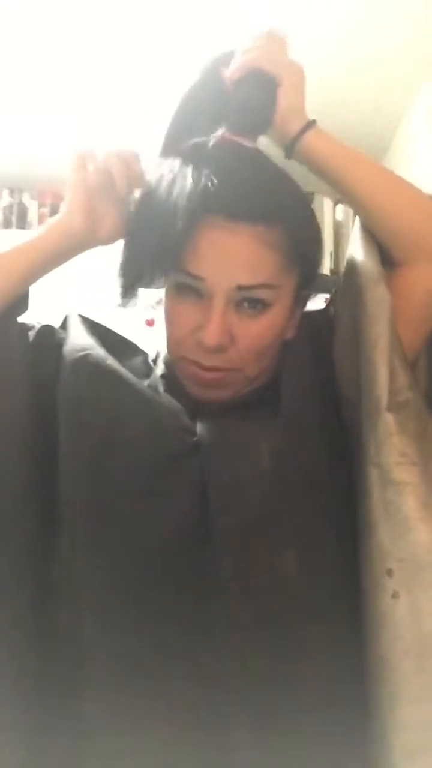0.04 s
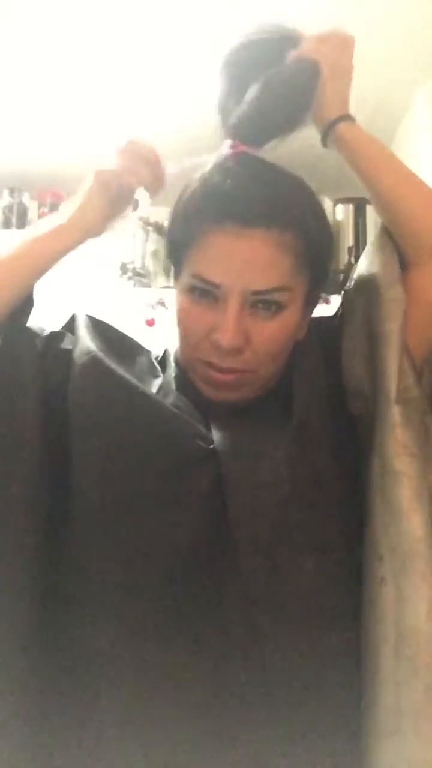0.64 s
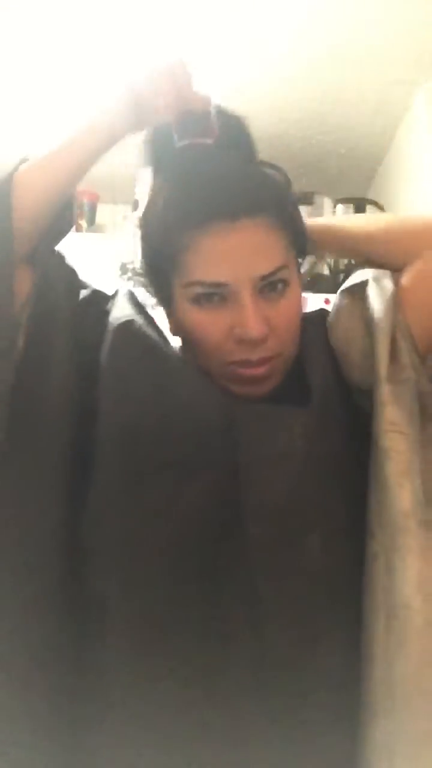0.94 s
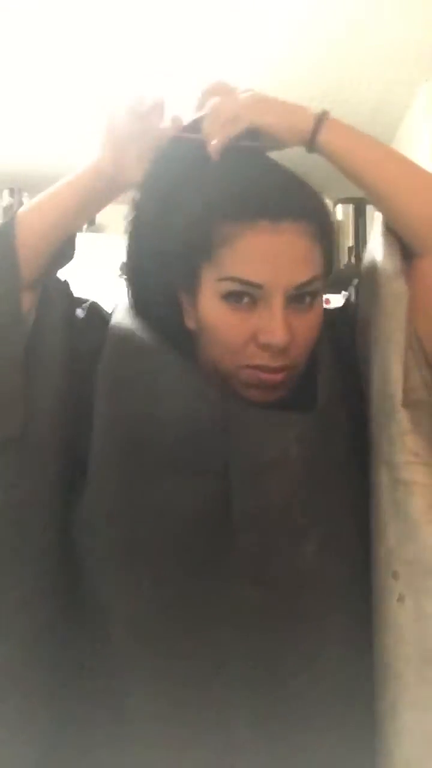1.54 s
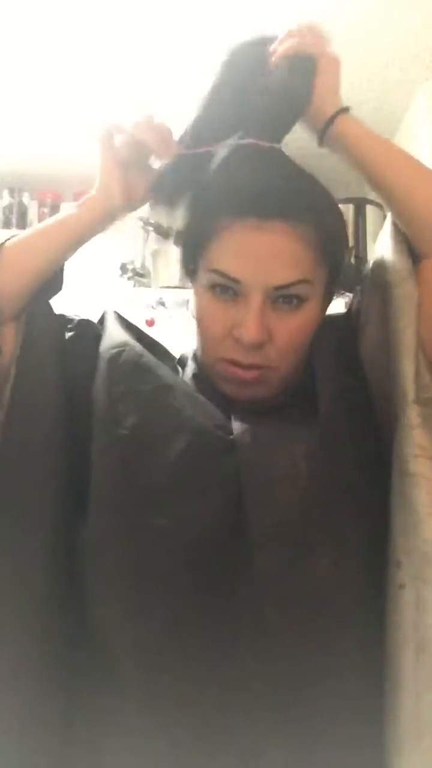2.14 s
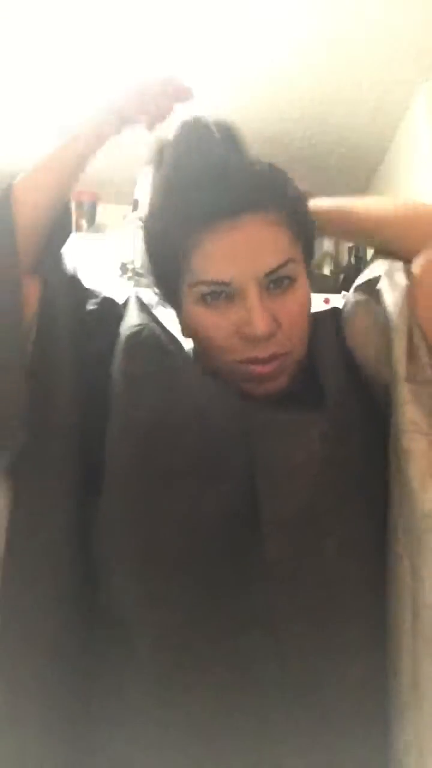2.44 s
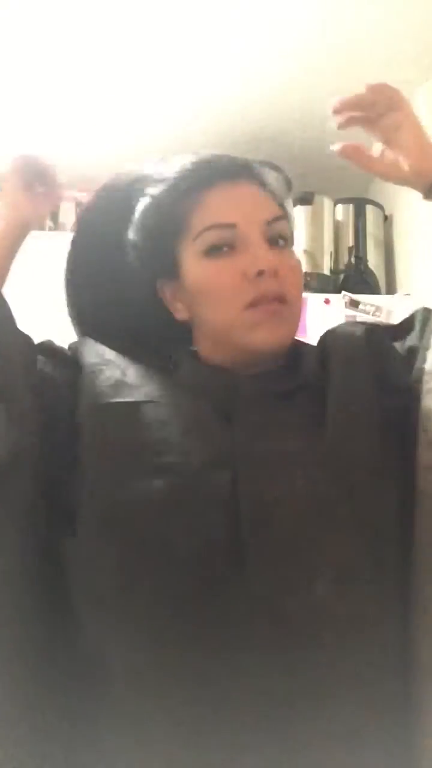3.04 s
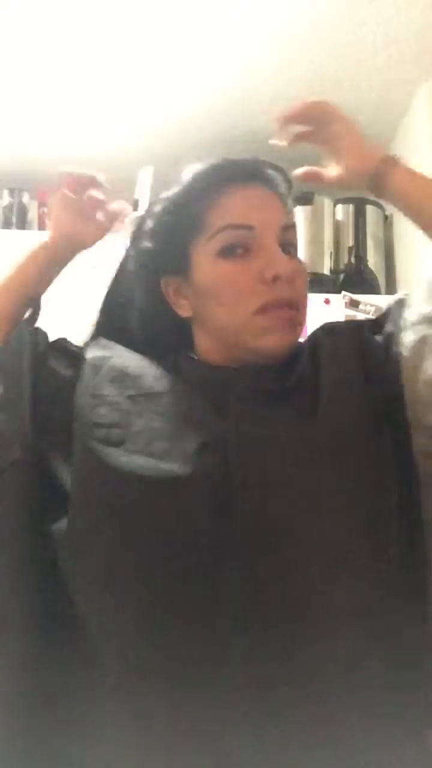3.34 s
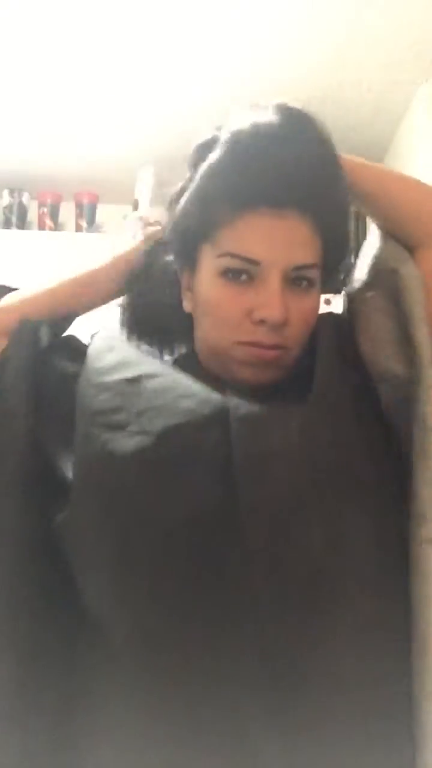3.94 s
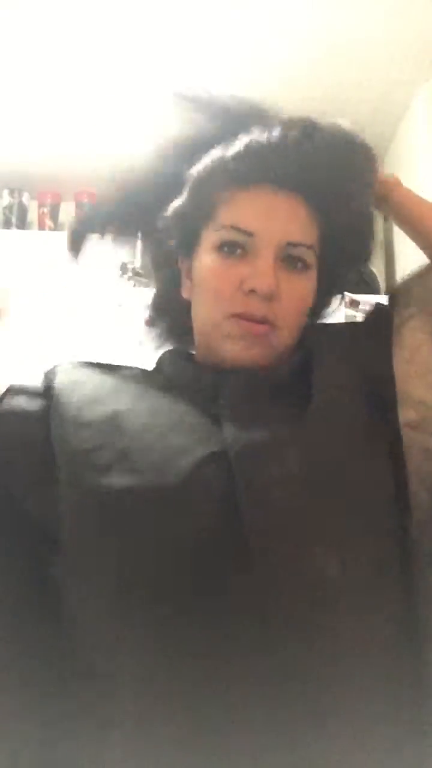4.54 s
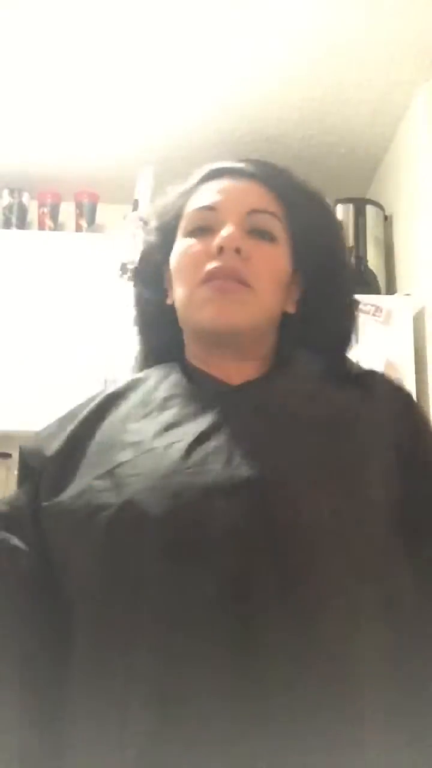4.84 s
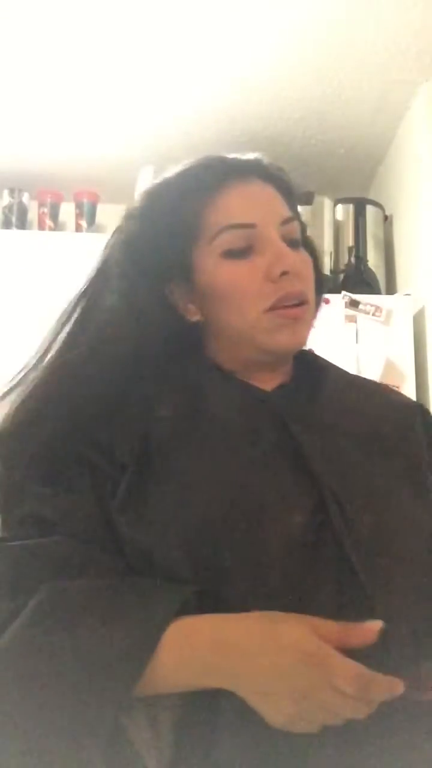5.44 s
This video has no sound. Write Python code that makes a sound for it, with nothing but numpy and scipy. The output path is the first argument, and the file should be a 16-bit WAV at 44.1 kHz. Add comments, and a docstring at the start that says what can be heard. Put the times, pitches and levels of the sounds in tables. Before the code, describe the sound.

Quiet, uneven strokes of hands through long hair rustle and hiss near the microphone, with a couple of soft plucks from a hair tie. The strokes grow busier, mixed with small snaps of tangles and the crinkle of a thin cape. Then the cape rustles louder and flaps sharply as the arms come down, and fades. Low room noise and a faint wavering hum fill the small, dry room.

```python
"""Shaking out long hair

Someone in a thin salon cape pulls long hair loose, close to a phone in a small room.
Hands swish along the hair, strands hiss between the fingers, the hair tie slips and tangles give way.
The cape crinkles, then billows and snaps its folds as the arms drop.
A low appliance hum wavers under the quiet room noise."""
import sys
import numpy as np
from scipy import signal
from scipy.fft import rfft, irfft, next_fast_len
from scipy.io import wavfile
from scipy.ndimage import uniform_filter1d, map_coordinates

SR = 44100
rng = np.random.default_rng(int(sys.argv[2]) if len(sys.argv) > 2 else 0)


def digitize_waveform(pressure):
    """Quantize a signal to 16-bit integers and store it at the path in sys.argv[1].

    Rows of a 2-D input are taken as channels; values are limited to [-1, 1].
    """
    field = np.atleast_2d(pressure).T
    bounded = np.clip(field, -1, 1)
    quanta = np.round(bounded * 32767).astype(np.int16)
    wavfile.write(sys.argv[1], SR, quanta)


N = 246641

# A hand passes along the hair; a faster slide sounds higher, and the raised arm drags the cape.
# (start [s], length [s], relative levels of swish [dB], hiss [dB] and cape [dB], swish pitch [Hz])
HAND_PASSES = [(0.0, 0.05, -73, -70, -85, 2470), (.353, 0.011, -59, -71, -59, 2500),
               (0.396, 0.034, -65, -66, -71, 2400), (0.71, .16, -65, -71, -69, 2770),
               (0.921, .1, -52.5, -52, -61.5, 2430), (1.04, 0.036, -53, -68, -61, 2050),
               (1.13, 0.037, -47.5, -56, -55, 1840), (1.206, 0.099, -53, -64, -63.5, 2620),
               (1.662, 0.28, -70.5, -66.5, -69, 2700), (1.898, 0.014, -61, -67, -66, 2760),
               (2.085, 0.083, -58.5, -67.5, -69.5, 3200), (2.333, 0.023, -57.5, -55, -60.5, 2780),
               (2.449, 0.046, -49.5, -52.5, -62, 2800), (2.506, 0.057, -45.5, -52.5, -58.5, 2350),
               (2.625, 0.061, -42.5, -51, -51.5, 1780), (2.755, 0.24, -56, -62.5, -60, 1660),
               (3.047, 0.075, -55, -58.5, -55.5, 2180), (3.257, 0.21, -53.5, -58.5, -59.5, 2240),
               (3.525, 0.064, -46, -46.5, -54, 3500), (3.662, 0.036, -48.5, -47, -52.5, 2800),
               (3.973, 0.037, -55, -55.5, -55.5, 3800), (4.081, 0.04, -57.5, -57.5, -59, 3260),
               (4.308, 0.21, -65.5, -65, -65, 2560)]
# The arms come down and the hair slides over the cape.
# (time [s], relative levels of cape [dB] and hiss [dB])
ARM_DROP = [(4.49, -80, -85), (4.53, -55.5, -62.5), (4.66, -51.5, -51), (4.85, -41, -44), (5.05, -45, -46),
            (5.17, -43.5, -49), (5.28, -50.5, -55.5), (5.35, -58.5, -64), (5.59, -68.5, -66.5)]
# The hum grows louder for a moment (time [s], level [dB])
HUM_PEAKS = [(.05, -64), (.29, -60.5), (.55, -58.5), (.82, -55), (1.58, -58.5), (1.87, -62.5), (2.35, -62),
             (2.59, -58), (3.39, -62), (4.76, -61.5)]
# The hair tie slips with a dull pluck (time [s], strength [dB], pitch [Hz])
TIE_PLUCKS = [(.2592, -34.5, 580), (1.216, -31, 1220)]
# Tangles give way (time [s], strength [dB], pitch [Hz])
TANGLE_SNAPS = [(.2595, -44, 3220), (.92, -39.5, 2300), (3.191, -37, 1600), (3.263, -40.5, 4300),
                (3.4055, -34.5, 5650), (3.406, -35, 9500), (4.078, -46, 3070)]
# Locks of hair slip out of the fingers (start [s], length [s], level [dB])
LOCK_SLIPS = [(0.753, 0.042, -66), (1.13, 0.029, -64), (2.105, 0.022, -69), (2.618, 0.038, -55),
              (3.398, 0.05, -54.5), (4.074, 0.048, -54.5), (4.598, 0.032, -51.5)]
# Folds of the cape snap over (time [s], strength [dB], pitch [Hz])
FOLD_SNAPS = [(1.906, -39, 2730), (2.332, -39.5, 1750), (2.785, -37.5, 1300), (2.839, -37.5, 1170),
              (3.0585, -34.5, 820), (3.364, -37.5, 1120), (3.685, -25, 2700), (4.645, -35, 870),
              (4.6805, -30, 1700), (4.707, -25, 1970), (4.8018, -27, 617), (4.8047, -14.5, 1430),
              (4.965, -25.5, 1620), (5.035, -27, 1800), (5.054, -20, 1790), (5.127, -24.5, 1330),
              (5.225, -29.5, 1790)]
# The tone of each noise, from bass to treble (frequency [Hz], relative level [dB])
SWISH_TONE = [(500, -20.5), (1300, -3), (2400, 1), (2900, -2.5), (3600, 0), (4800, -9.5), (9000, -23)]
HISS_TONE = [(1000, -11.5), (2500, -1.5), (3800, 0), (4800, -3.5), (5600, -0.5), (6500, -1), (8300, -6.5),
             (9500, -6.5), (10300, -11), (11500, -8.5), (15500, -10.5)]
CRINKLE_TONE = [(100, -44), (250, -14.5), (420, -13.5), (550, -9), (760, -7.5), (1000, -2.5), (1350, 0),
                (1700, -3), (2300, -10.5), (4000, -26), (15000, -45)]
BILLOW_TONE = [(40, -28), (100, -7), (160, 3), (300, -6), (600, -19.5), (1500, -69)]
ROOM_TONE = [(20, -38), (38, -8), (58, 4.5), (90, -1), (150, 6), (200, -2.5), (300, -10.5), (600, -11),
             (1500, -14), (4500, -20.5), (6500, -21), (10000, -30), (15500, -26.5)]
LOCK_TONE = [(3000, -22), (6500, 6), (9000, 1.5), (15500, -2.5)]
# How long the room echoes (frequency [Hz], time to fade by 60 dB [s])
ECHO_TIMES = [(150, 0.15), (1500, 0.078), (10000, 0.074)]

TIME = np.arange(N) / SR  # seconds


def amp(db):
    """Turn decibels into a number to multiply by."""
    return 10 ** (np.asarray(db) / 20)


def unit(x):
    """Scale a signal to an average (rms) size of 1."""
    return x / np.sqrt(np.mean(x ** 2) + 1e-20)


def along(points, hz):
    """Read a table between its rows, giving each octave equal room."""
    freqs, values = np.transpose(points)
    return np.interp(np.log(hz + 1), np.log(freqs + 1), values)


def curves(rows):
    """Turn each column after the time into one value per sample."""
    times, *columns = np.transpose(rows)
    return [np.interp(TIME, times, column) for column in columns]


def wobble(rate):
    """A smooth curve through `rate` random points a second."""
    points = rng.standard_normal(int(N * rate / SR) + 4)
    return map_coordinates(points, [TIME * rate])


def swell(start, length, rise, fall):
    """A level that climbs, holds and dies away; rise and fall are the seconds for 20 dB."""
    t = TIME - start
    outside = np.maximum(-t, 0) / rise + np.maximum(t - length, 0) / fall
    return amp(-20 * np.minimum(outside, 10))


def filtered(x, response):
    """Multiply each frequency in x by response(hz)."""
    size = next_fast_len(N + SR // 2)
    hz = np.fft.rfftfreq(size, 1 / SR)
    return irfft(rfft(x, size) * response(hz), size)[:N]


def coloured(x, tone):
    """Shape x with a tone table, at an average size of 1."""
    return unit(filtered(x, lambda hz: amp(along(tone, hz))))


def friction(slips_per_s, spread_db, slip_share, clump_db):
    """Fibres stick and slip: tiny uneven clicks on top of a smooth rub, coming in clumps."""
    happens = rng.random(N) < slips_per_s / SR
    sizes = amp(spread_db * np.clip(rng.standard_normal(N), -2, 2))
    slips = unit(happens * sizes * rng.choice([-1, 1], N))
    rub = np.sqrt(slip_share) * slips + np.sqrt(1 - slip_share) * rng.standard_normal(N)
    return rub * amp(clump_db * wobble(70))


def drifting(x, patchy_db):
    """Sound bounces off arms, head and walls along changing paths, so some pitches come and go."""
    spectrum = signal.stft(x, nperseg=1024)[2]
    patches = uniform_filter1d(rng.standard_normal(spectrum.shape), size=4, axis=0)  # blur in pitch
    patches = uniform_filter1d(patches, size=12, axis=1)  # blur in time
    return signal.istft(spectrum * amp(patchy_db * unit(patches)), nperseg=1024)[1][:N]


def movements(lag_s=0.028, tire_db=0.4, sink_octaves_per_s=1):
    """Moving hands and arms set the swish, hiss and cape levels [dB] and the swish pitch [Hz]."""
    t = TIME
    drop_cape, drop_hiss = amp(curves(ARM_DROP))
    drop_swish = amp(-2.5) * np.interp(t - lag_s, t, drop_cape)  # falling hair follows the cape
    # Noises add as squares. The small steady part is the hands holding the hair between passes.
    swish = drop_swish ** 2 + amp(-75) ** 2
    hiss = drop_hiss ** 2 + amp(-74.5) ** 2
    cape = drop_cape ** 2 + amp(-77.5) ** 2
    pitch_sum = swish * 2020  # held or falling hair swishes around 2020 Hz
    for start, length, swish_db, hiss_db, cape_db, hz in HAND_PASSES:
        ease_s = 0.48 * length  # a longer pass starts and ends more gently
        gain = swell(start, length, rise=0.042 + ease_s, fall=0.067 + ease_s)
        # The hand weakens and slows along the lock, so level and pitch sink.
        from_middle = np.clip(t - start, 0, length) - length / 2
        power = (gain * amp(-tire_db * from_middle / length)) ** 2
        pitch = hz * 2 ** (-sink_octaves_per_s * from_middle)
        swish += power * amp(swish_db) ** 2
        hiss += power * amp(hiss_db) ** 2
        cape += power * amp(cape_db) ** 2
        pitch_sum += power * amp(swish_db) ** 2 * pitch
    return 10 * np.log10(swish), 10 * np.log10(hiss), 10 * np.log10(cape), pitch_sum / swish


def hand_swish(level_db, pitch_hz, sharpness=3.1, floor_db=-8.5):
    """A hand rubs along the hair, loudest around a pitch that follows its speed."""
    rub = friction(slips_per_s=900, spread_db=2.5, slip_share=0.31, clump_db=2.5)
    hz, t, spectrum = signal.stft(drifting(rub, patchy_db=3.5), SR, nperseg=256)
    ratio = (hz[:, None] + 1) / np.interp(t, TIME, pitch_hz)
    peak = 1 / np.sqrt(1 + (sharpness * (ratio - 1 / ratio)) ** 2)
    tone = amp(along(SWISH_TONE, hz))[:, None]
    swish = signal.istft(spectrum * (peak + amp(floor_db)) * tone, SR, nperseg=256)[1][:N]
    return amp(level_db) * unit(swish)


def strand_hiss(level_db):
    """Thousands of strands slip past each other and through the fingers."""
    rub = friction(slips_per_s=1800, spread_db=4, slip_share=0.45, clump_db=0.9)
    return amp(level_db + 2.5) * coloured(drifting(rub, patchy_db=2.5), HISS_TONE)


def cape_crinkle(level_db):
    """The thin cloth crinkles as the arms drag it."""
    rub = friction(slips_per_s=700, spread_db=3, slip_share=0.5, clump_db=1.1)
    return amp(level_db + 0.5) * coloured(drifting(rub, patchy_db=3), CRINKLE_TONE)


def cape_billow():
    """Air rushes low under the cape, which always stirs a little, falls with the arms and flaps once."""
    stir = amp(-72)
    drop = amp(curves(ARM_DROP)[0] - 18)
    flap = amp(-50) * swell(start=4.803, length=0, rise=0.014, fall=0.071)
    return (stir + drop + flap) * coloured(rng.standard_normal(N), BILLOW_TONE)


def room_noise():
    """A quiet, steady rush, strongest in the bass."""
    return amp(-62.5) * coloured(rng.standard_normal(N), ROOM_TONE)


def appliance_hum(hz=118, base_db=-78.5, waver_db=4.5, swell_s=0.05):
    """An appliance hums, wavering and swelling, with a faint tone an octave higher."""
    level = amp(base_db + waver_db * wobble(8.5))
    for time, db in HUM_PEAKS:
        bump = np.exp(-0.5 * ((TIME - time) / swell_s) ** 2)
        level = np.maximum(level, amp(db) * bump)
    phase = 2 * np.pi * hz * TIME + 0.35 * wobble(6)
    return np.sqrt(2) * (level * np.sin(phase) + amp(-81) * np.sin(2 * phase))


def snaps(rows, rise_cycles):
    """A tie, tangle or fold lets go: a sharp push that swings briefly and dies away."""
    out = np.zeros(N + SR)
    t = np.arange(SR // 20) / SR
    for time, db, hz in rows:
        age = hz * t / rise_cycles
        level = amp(db) * age * np.exp(1 - age)
        out[round(time * SR):][:len(t)] -= level * np.sin(2 * np.pi * hz * t)
    return out[:N]


def slipping_locks():
    """A lock of hair breaks free at once, then thins out in a bright crackle."""
    level = np.zeros(N)
    for start, length, db in LOCK_SLIPS:
        level += amp(db) * np.interp(TIME - start, [0, 0.004, length, length + 0.018], [0.023, 1, 1, 0.027])
    rub = friction(slips_per_s=1400, spread_db=4, slip_share=0.46, clump_db=2)
    return level * coloured(rub, LOCK_TONE)


def room_echo(x, delay_s=0.0044):
    """The small room gives a short echo whose treble dies first."""
    hz, t, spectrum = signal.stft(rng.standard_normal(SR // 2), SR, nperseg=256)
    fade = amp(-60 * t / along(ECHO_TIMES, hz)[:, None])
    tail = signal.istft(spectrum * fade, SR, nperseg=256)[1]
    tail = np.pad(tail, (round(delay_s * SR), 0))
    return signal.fftconvolve(x, tail / np.linalg.norm(tail))[:N]


def scene():
    """Mix the rustle, the snaps, their echoes and the background into one channel."""
    swish_db, hiss_db, cape_db, pitch_hz = movements()
    rustle = hand_swish(swish_db, pitch_hz) + cape_crinkle(cape_db) + cape_billow()
    rustle += strand_hiss(hiss_db) + slipping_locks()
    clicks = snaps(TIE_PLUCKS, rise_cycles=0.3)
    clicks += snaps(TANGLE_SNAPS, rise_cycles=1.67)
    clicks += snaps(FOLD_SNAPS, rise_cycles=0.5)
    background = room_noise() + appliance_hum()
    echoes = amp(-15) * room_echo(rustle) + amp(-5.5) * room_echo(clicks)
    return (rustle + clicks + echoes + background)[None]


def record(dry):
    """The phone loses the deep bass and the very highest treble."""
    bass_hz, top_hz = 30, 15850
    return filtered(dry[0], lambda hz: (hz < top_hz) * (1j * hz / (1j * hz + bass_hz)) ** 2)[None]


dry = scene()
out = record(dry)
digitize_waveform(out)
```